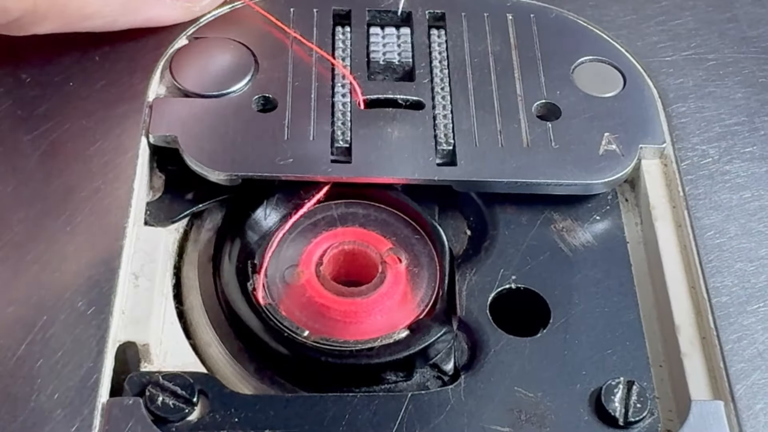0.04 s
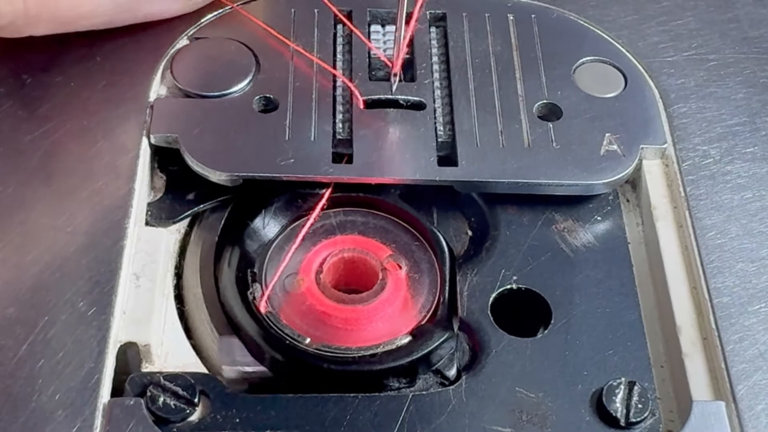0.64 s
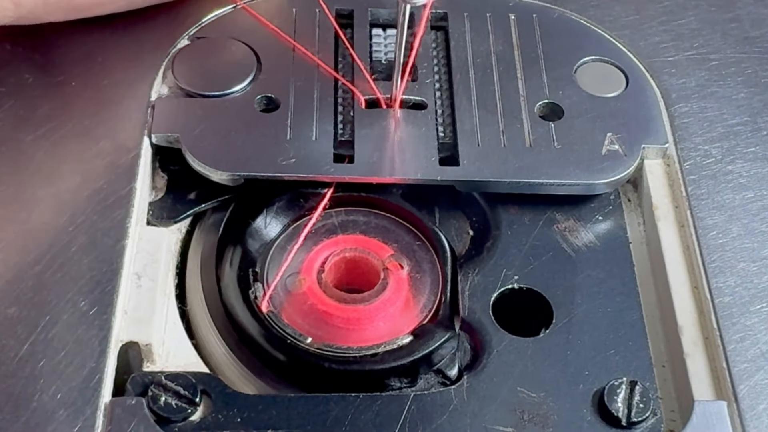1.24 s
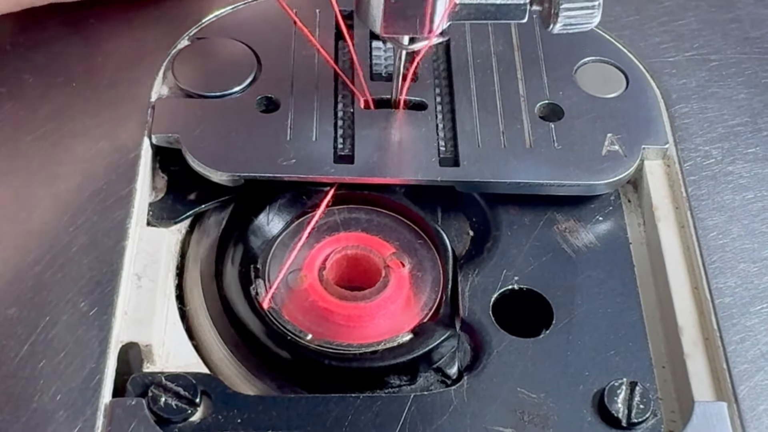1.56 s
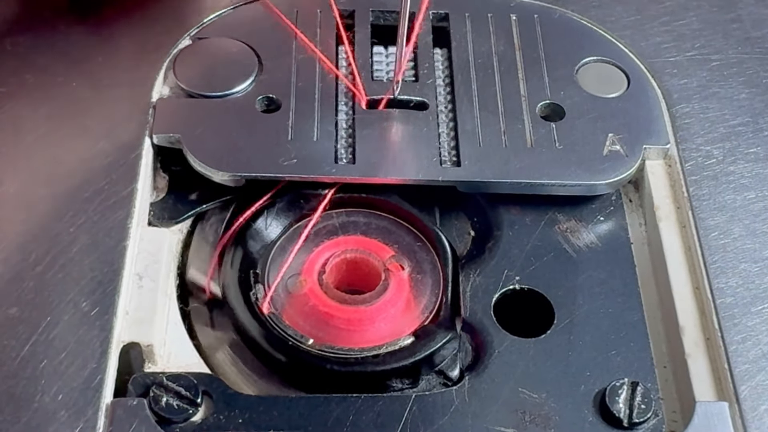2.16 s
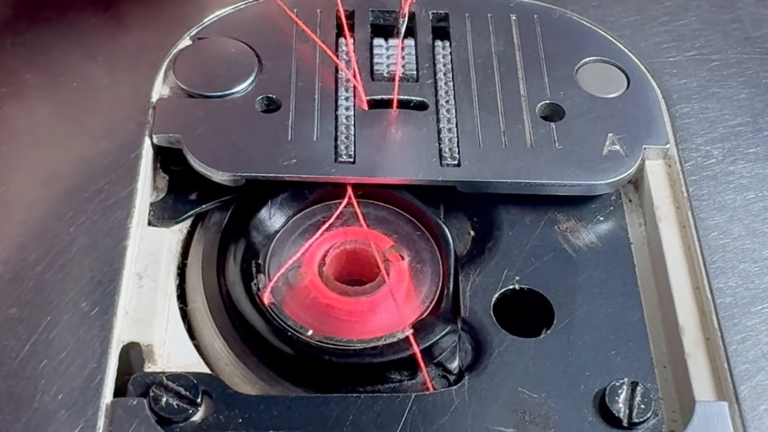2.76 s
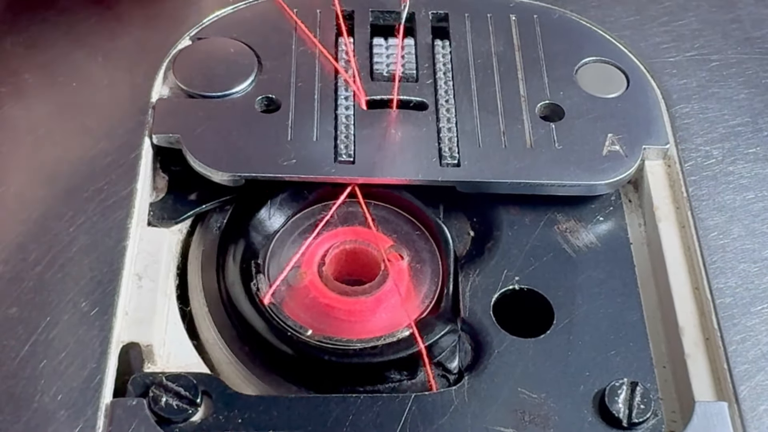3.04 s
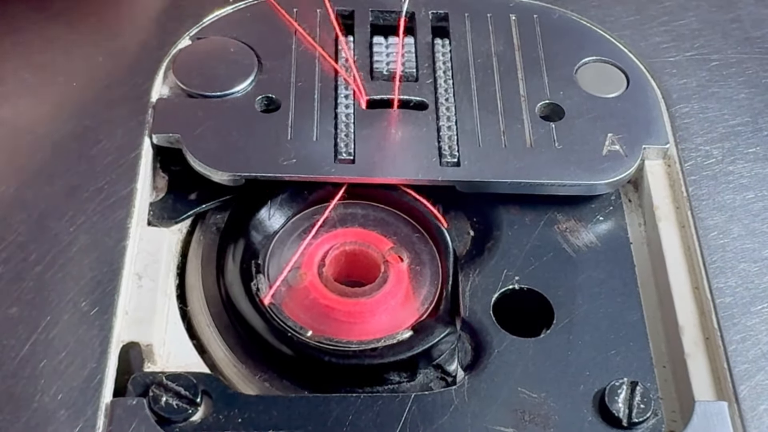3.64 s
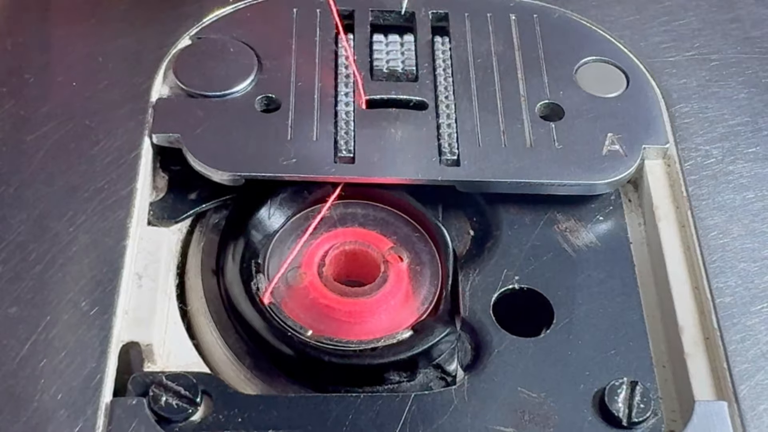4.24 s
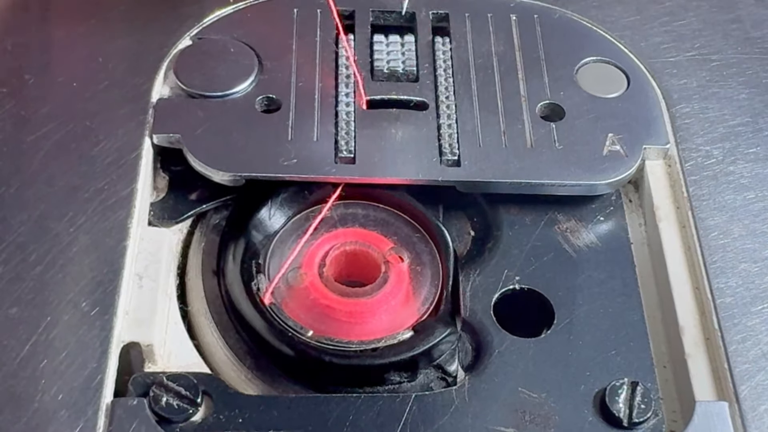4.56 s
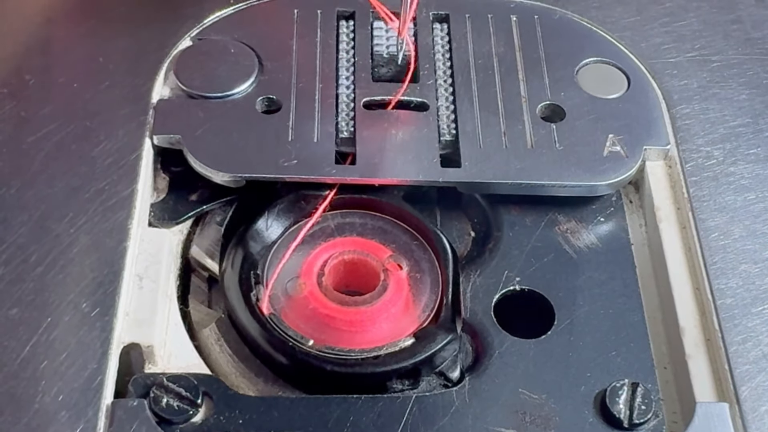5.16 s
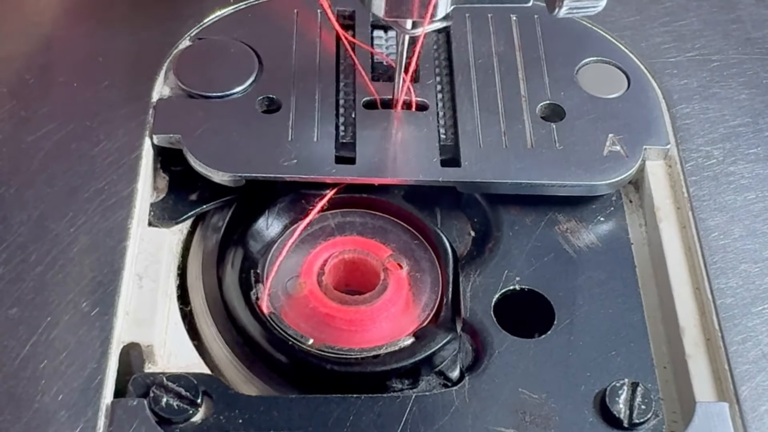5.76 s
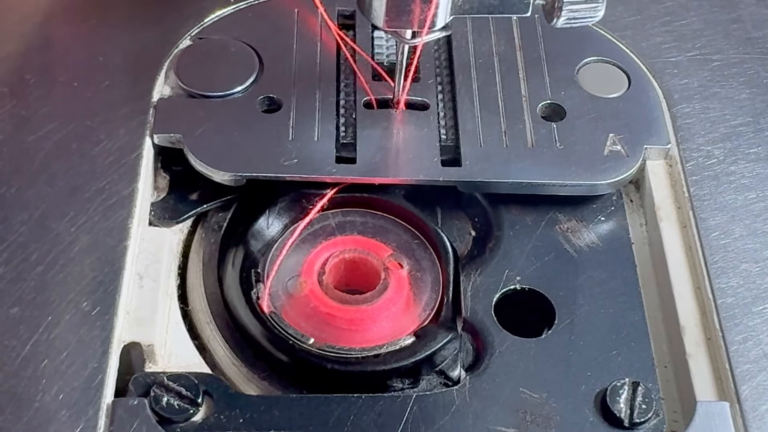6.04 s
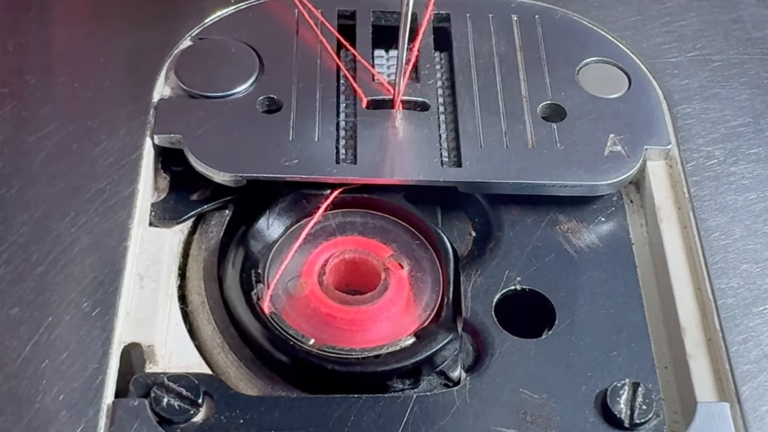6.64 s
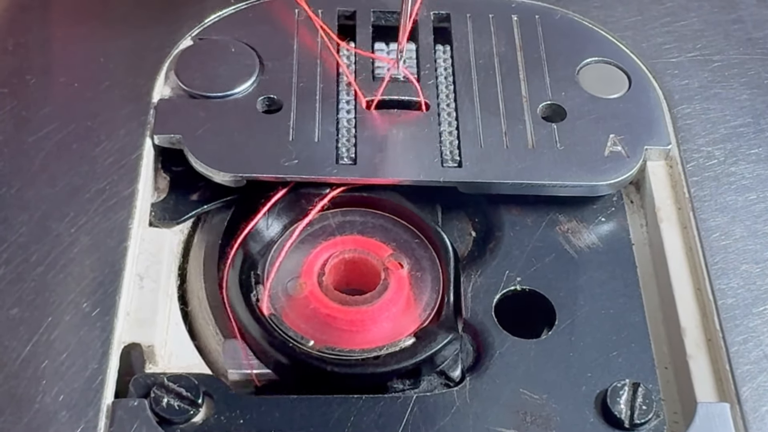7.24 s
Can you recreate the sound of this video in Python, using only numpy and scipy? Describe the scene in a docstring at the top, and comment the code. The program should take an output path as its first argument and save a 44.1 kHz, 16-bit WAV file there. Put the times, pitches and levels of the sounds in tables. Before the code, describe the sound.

A sewing machine is turned slowly by hand through two stitches, heard close in a quiet room. Oiled steel parts slide faintly and click at uneven moments, and the drive gives soft, dull knocks. Taut thread snaps with tiny sharp ticks at the start and drags with a short, grainy rustle twice later on. A quick cluster of metal clicks comes at the end. A small motor hums low and steadily throughout.

```python
"""Sewing machine turned by hand.

Two slow stitches, heard close. Steel parts slide and click, the thread is dragged and
plucked round the bobbin case, and the drive knocks softly as its play is taken up.
A small motor hums somewhere in the quiet room."""
import sys
import numpy as np
from scipy import signal
from scipy.fft import rfft, irfft, next_fast_len
from scipy.io import wavfile
from scipy.ndimage import uniform_filter1d

SR = 44100
rng = np.random.default_rng(int(sys.argv[2]) if len(sys.argv) > 2 else 0)


def file_out(sig):
    """Save sig as 16-bit WAV at sys.argv[1]."""
    # one column per channel
    cols = np.atleast_2d(sig).T
    # limit, then scale
    lim = np.clip(cols, -1, 1)
    pcm = np.round(lim * 32767).astype(np.int16)
    wavfile.write(sys.argv[1], SR, pcm)


N = 330309
TIME, FREQS = np.arange(N) / SR, np.fft.rfftfreq(next_fast_len(N, True), 1 / SR)
BURST_T = np.arange(4096) / SR


def amp(db):
    """Decibels to gain."""
    return 10 ** (np.asarray(db) / 20)


def unit(x):
    """Scales to rms 1."""
    return x / np.sqrt(np.mean(x ** 2) + 1e-30)


def read(points, hz):
    """Interpolates a table over log frequency."""
    f, value = np.transpose(points)
    return np.interp(np.log(hz + 1), np.log(f + 1), value)


def colour(x, gain):
    """Filters by one gain per bin of FREQS."""
    size = next_fast_len(N, True)
    return irfft(rfft(x, size) * gain, size)[..., :N]


def band(x, lo_hz, hi_hz, order=4):
    """Causal band-pass."""
    sos = signal.butter(order, [lo_hz, min(hi_hz, SR / 2 - 1)], "band", fs=SR, output="sos")
    return signal.sosfilt(sos, x)


def wander(hz):
    """Random drift of rms 1, up to about hz."""
    steps = np.arange(0, TIME[-1] + 1, .5 / hz)
    return unit(np.interp(TIME, steps, rng.standard_normal(len(steps))))


def add(mix, at_s, db, sound):
    """Adds a short sound with the energy of 10 ms at level db."""
    part = mix[round(at_s * SR):][:len(sound)]
    gain = amp(db) * np.sqrt(.01 * SR / np.sum(sound ** 2))
    part += gain * sound[:len(part)]


def burst(lo_hz, hi_hz, rise_s, decay_s):
    """Impact in one band: a brief crack, then many close modes swell and die."""
    crack = 2.4 * np.exp(-BURST_T / (.27 * decay_s))
    envelope = (1 - np.exp(-BURST_T / rise_s)) * (crack + np.exp(-BURST_T / decay_s))
    return band(rng.choice([-1., 1.], len(BURST_T)) * envelope, lo_hz, hi_hz, order=3)


# diffuse field: f/Hz, left-right coherence/0-1
COHERENCE = [(60, .999), (250, 0.86), (600, 0.5), (1500, 0), (3000, 0.7), (6000, 1), (9000, 0.98)]

def diffuse(a, b):
    """Two unrelated signals form a diffuse stereo field."""
    coherence = np.clip(read(COHERENCE, FREQS), 0, 1)
    mid = colour(a, np.sqrt((1 + coherence) / 2))
    side = colour(b, np.sqrt((1 - coherence) / 2))
    return np.array([mid + side, mid - side])


# room noise spectrum: f/Hz, gain/dB
AIR_SPECTRUM = [(20, -27), (40, -16), (100, -10.5), (135, -0.5), (210, -2.5), (290, -9), (360, -7),
                (520, -13), (720, -20.5), (1250, -21.5), (1500, -26.5), (2000, -29), (2900, -42),
                (4000, -42), (4800, -57.5), (8000, -59), (12500, -64.5), (15200, -57.5)]

def room_air():
    """Dull, even room noise."""
    noise = diffuse(*rng.standard_normal((2, N)))
    return amp(-49.5) * unit(colour(noise, amp(read(AIR_SPECTRUM, FREQS))))


def tone(cycles, unsteady, flutter_hz):
    """A hum of rms 1, trembling in level and phase."""
    tremble = 1 + unsteady * (wander(flutter_hz) + 1j * wander(flutter_hz))
    return unit((tremble * np.exp(2j * np.pi * (cycles + rng.random()))).real)


# motor harmonics: shaft order, relative level/dB, unsteadiness/0-1
MOTOR_HARMONICS = [(1, 0, 0.06), (2, -29, 0.6), (3, -27.5, 0.1), (5, -25.5, .25), (6, -30.5, 0.4),
                   (7, -38, 0.9), (18, -32.5, 0), (19, -41, 0.3), (20, -37, 0.1), (21, -46.5, 0),
                   (25, -44.5, 0.1)]
# brief dips in the motor's level: t/s
MOTOR_DIPS = [.44, 1.71, 3.32]
# other room hums: f/Hz, level/dB, unsteadiness/0-1
ROOM_DRONES = [(139.2, -56.5, 0.6), (166, -57.5, 0.5), (245.6, -53, 0.16), (326.2, -61, 1), (348, -65, 1)]

def hum():
    """A motor hums at multiples of its shaft speed, over the other hums of the room."""
    shaft_hz, dip_db, dip_half_width_s = 77.21, -1.1, .042
    turns = np.cumsum(shaft_hz + .08 * wander(1.5)) / SR
    motor = sum(amp(db) * tone(round(order) * turns, unsteady, flutter_hz=4)
                for order, db, unsteady in MOTOR_HARMONICS)
    drones = sum(amp(db) * tone(hz * TIME, unsteady, flutter_hz=9) for hz, db, unsteady in ROOM_DRONES)
    dips = sum(np.exp(-((TIME - at_s) / dip_half_width_s) ** 2) for at_s in MOTOR_DIPS)
    motor_db = -34 + dip_db * dips + .26 * wander(5)
    sound = unit(motor) * amp(motor_db) + drones
    # bass louder on the right, earlier on the left
    balance_db = read([(80, -1.8), (200, .3), (1400, 1.4)], FREQS)
    lead_rad = read([(80, .37), (200, .26)], FREQS)
    left = amp(balance_db / 2) * np.exp(.5j * lead_rad)
    return np.array([colour(sound, left), colour(sound, 1 / left)])


# room decay: f/Hz, T60/s
ROOM_DECAY = [(500, .3), (3000, 0.18), (8000, 0.12), (15000, 0.094)]

def reverb(x):
    """A short diffuse tail that dies sooner in the treble."""
    hz, t, spectra = signal.stft(rng.standard_normal((2, SR // 2)), SR, nperseg=256)
    decay = amp(-60 * t / read(ROOM_DECAY, hz)[:, None])
    tails = signal.istft(spectra * decay, SR, nperseg=256)[1]
    tails *= 1 - np.exp(-np.arange(tails.shape[1]) / SR / .0055)  # build-up
    wet = signal.fftconvolve(x[None], tails / np.linalg.norm(tails[0]), axes=1)[:, :N]
    wet_db = read([(1000, -14.5), (4000, -15), (9000, -22.5), (15000, -10.5)], FREQS)
    return colour(diffuse(*wet), amp(wet_db))


def loose_parts():
    """Loose parts touch lightly at random moments."""
    per_s, level_db, spread_db = 3.4, -81.5, 4
    out = np.zeros(N)
    for when, size in rng.random((round(per_s * N / SR), 2)):
        tick = burst(5000, 13000, rise_s=.001, decay_s=.0044)
        add(out, when * TIME[-1], level_db + spread_db * (2 * size - 1), tick)
    return out


# thread resonances: start/s, end/s, f/Hz, width/Hz, level/dB
THREAD_NOTES = [(2.784, 2.96, 4700, 700, -71), (3.995, 4.204, 11530, 350, -81),
                (7.062, 7.294, 11400, 700, -74)]

def thread_singing():
    """Sliding round the bobbin case feeds one resonance of the taut thread."""
    out = np.zeros(N)
    for start, end, hz, width, db in THREAD_NOTES:
        arch = np.sin(np.pi * np.clip((TIME - start) / (end - start), 0, 1))
        resonance = band(rng.standard_normal(N), hz - width / 2, hz + width / 2, order=2)
        out += amp(db) * arch * unit(resonance)
    return out


def friction(per_s, spread_db, smooth):
    """Tiny slips of uneven size over a smooth rub."""
    sizes = amp(spread_db * np.minimum(rng.exponential(1, N), 4))
    slips = sizes * rng.choice([-1., 1.], N) * (rng.random(N) < per_s / SR)
    return unit(unit(slips) + smooth * rng.standard_normal(N))


def moving_contact(x, depth_db, lasting_s, width_hz):
    """Resonances come and go as the contact moves along."""
    spectra = signal.stft(x, SR, nperseg=512)[2]
    patches = rng.standard_normal(spectra.shape)
    patches = uniform_filter1d(patches, max(1, round(width_hz * 512 / SR)), axis=0)
    patches = uniform_filter1d(patches, max(1, round(lasting_s * SR / 256)), axis=1)
    return signal.istft(spectra * amp(depth_db * unit(patches)), SR, nperseg=512)[1][:N]


def strokes(rows, attack_s, release_s):
    """Body and treble gains of a rub: each stroke eases in, swells or sags, and dies away."""
    body, treble = np.zeros((2, N))
    for start, end, db, treble_db, swell_db in rows:
        progress = np.clip((TIME - start) / (end - start), 0, 1)
        attack = (1 + np.tanh((TIME - start) / (2 * attack_s))) / 2
        release = np.exp(-np.maximum(TIME - end, 0) / release_s)
        gain = attack * release * amp(db + swell_db * (progress - .5))
        body, treble = np.hypot(body, gain), np.hypot(treble, gain * amp(treble_db))
    return body, treble


# handwheel pushes: start/s, end/s, level/dB, treble re level/dB, swell/dB
WHEEL_PUSHES = [(0, .3, -73, -2, -3), (.37, .72, -75, -4.5, -1.5), (.73, .87, -81, -8, -3),
                (1.23, 1.52, -71, -3, -6.5), (1.53, 1.66, -68, -3.5, -2), (1.98, 2.06, -72, -6, -4),
                (2.15, 2.24, -72.5, -1.5, -7), (2.35, 2.49, -68, -2.5, 3), (2.8, 2.85, -69, -2.5, -8),
                (3.44, 3.62, -78, -3.5, -11), (3.78, 3.96, -88, 1, 0), (4.03, 4.19, -79, -2, 0),
                (5.02, 5.145, -71, -2.5, 8), (5.41, 5.49, -71, -1, -0.5), (5.63, 5.86, -68, -2, -8),
                (6.12, 6.24, -67, -1.5, -2.5), (6.27, 6.41, -68.5, -3.5, 0), (6.72, 6.86, -71.5, -2.5, 3.5),
                (6.87, 7.02, -68.5, -4.5, -8), (7.08, 7.21, -74.5, -2, -9), (7.25, 7.34, -63.5, -1.5, 1),
                (7.35, 7.385, -51.5, -3, -3)]
# steel rub spectrum, with a low-pass at 16 kHz: f/Hz, gain/dB
SLIDE_FILTER = [(1500, 6), (2500, -2), (3600, -1.5), (4800, -2.5), (6000, -11), (7000, -10), (7400, -10),
                (8100, -13.5), (9500, -10.5), (11300, -10), (12400, -4), (13600, -13), (15600, -6.5),
                (16200, -31)]

def steel_sliding():
    """Oiled steel rubs finely, catches now and then, and excites the machine's resonances."""
    idle_body_db, idle_treble_db = -86.5, -91  # bearings between pushes
    body, treble = strokes(WHEEL_PUSHES, attack_s=.0084, release_s=.017)
    grain = friction(per_s=3000, spread_db=3.5, smooth=1)
    catches = amp(-7) * friction(per_s=50, spread_db=2.5, smooth=0)
    contact = moving_contact(grain + catches, depth_db=3.5, lasting_s=.1, width_hz=450)
    rub = colour(contact, amp(read(SLIDE_FILTER, FREQS)))
    hiss = unit(band(rub, 6300, 16000)) * np.hypot(treble, amp(idle_treble_db))
    rasp = unit(band(rub, 1700, 6300)) * np.hypot(body, amp(idle_body_db))
    flicker_db = .55 * wander(30) + 1.1 * wander(9)
    return (hiss + rasp) * amp(flicker_db)


# thread pulls: start/s, end/s, level/dB, treble re level/dB, swell/dB
THREAD_PULLS = [(2.895, 3.005, -60.5, -9.5, 0.5), (4.712, 4.965, -56, -6.5, -7)]
# thread rub spectrum, with a low-pass at 16 kHz: f/Hz, gain/dB
DRAG_FILTER = [(700, 3.5), (1200, -1), (2100, -15), (2900, -16.5), (4400, -14), (5700, -17), (7300, -15),
               (8500, -6), (9400, -6), (10200, -7), (12200, -7), (13300, -18.5), (15400, 2), (16300, -21)]

def thread_dragging():
    """Fibres catch and slip in the guides, grainier than the steel."""
    body, treble = strokes(THREAD_PULLS, attack_s=.0097, release_s=.015)
    grain = friction(per_s=1600, spread_db=3.5, smooth=.4)
    contact = moving_contact(grain, depth_db=4, lasting_s=.021, width_hz=400)
    rub = colour(contact, amp(read(DRAG_FILTER, FREQS)))
    fizz = unit(band(rub, 7000, 16000)) * treble
    rustle = unit(band(rub, 610, 7000)) * body
    return fizz + rustle


# drive knocks: t/s, thud/dB, first touch/dB
DRIVE_KNOCKS = [(.959, -50, -57.5), (1.616, -47.5, -73), (1.77, -56.5, -83.5), (4.437, -53.5, -71),
                (4.738, -47.5, -64), (5.213, -49.5, -69.5), (5.937, -43, -64.5), (6.335, -49.5, -71),
                (6.484, -53.5, -68), (6.499, -50, -78), (6.69, -62, -70)]
# housing modes: f/Hz, relative level/dB, T60/s
HOUSING_MODES = [(506, 0, 0.041), (587, 4.5, 0.067), (685, -2, 0.065), (860, -10.5, 0.095),
                 (940, -1, 0.034), (1058, -6.5, 0.099), (1255, -4, 0.063)]

def drive_knocks():
    """Play in the drive is taken up: a light touch, then the housing's low modes ring."""
    out = np.zeros(N)
    for at_s, thud_db, touch_db in DRIVE_KNOCKS:
        thud = np.zeros(len(BURST_T))
        for hz, db, t60 in HOUSING_MODES:
            cycles = hz * rng.normal(1, .011) * BURST_T + rng.random()
            thud += amp(db - 60 * BURST_T / t60) * np.sin(2 * np.pi * cycles)
        add(out, at_s, thud_db, thud * (1 - np.exp(-BURST_T / .00094)))
        add(out, at_s - .001, touch_db, burst(1400, 4600, rise_s=.0012, decay_s=.011))
    return out


# thread snaps: t/s, level/dB
THREAD_SNAPS = [(0.1419, -46), (0.1945, -60), (0.2172, -35.5), (2.8999, -61), (2.928, -56), (2.9762, -48.5),
                (2.98, -56.5), (2.992, -56.5), (4.73, -51.5), (4.735, -35.5), (4.7625, -47), (4.7816, -41),
                (4.8496, -42.5), (4.9215, -51.5), (4.9435, -48), (4.95, -52), (4.9926, -47.5)]

def thread_snaps():
    """The taut thread snaps over an edge and shakes the frame."""
    out = np.zeros(N)
    for at_s, db in THREAD_SNAPS:
        twang = unit(burst(8230, 9700, rise_s=.00022, decay_s=.0027))
        crack = unit(burst(8300, 16200, rise_s=.00015, decay_s=.0021))
        rattle = unit(burst(3600, 7600, rise_s=.0022, decay_s=.0046))
        thump = unit(burst(592, 2200, rise_s=.0039, decay_s=.015))
        add(out, at_s - .0003, db, twang + amp(-4.5) * crack)
        add(out, at_s, db - 11.5, rattle + amp(2.5) * thump)  # frame
    return out


# needle plate and hook modes: f/Hz, gain/dB, T60/s
PLATE_MODES = [(3500, -14, 0.13), (6000, -14, .12), (7420, 8, 0.14), (9340, -15, .2), (10470, -6.5, .08)]

def plate_ring(x):
    """Needle plate and hook ring on faintly after being shaken."""
    out = np.zeros(N)
    for hz, db, t60 in PLATE_MODES:
        radius = amp(-60 / (t60 * SR))
        pole = radius * np.exp(2j * np.pi * hz / SR)
        out += amp(db) * 2 * signal.lfilter([1 - radius], [1, -pole], x).real
    return out


def struck_part(hz, decay_cycles):
    """One quickly damped mode."""
    cycles = hz * BURST_T
    return np.sin(2 * np.pi * cycles) * np.exp(-cycles / decay_cycles) * (1 - np.exp(-cycles / 2))


# hook, feed and needle bar clicks: t/s, blow/dB, hardness (treble re body)/dB, ring f/Hz, ring/dB
STEEL_CLICKS = [(0.9502, -47.5, -31.5, 3870, -52.5), (1.298, -70.5, -0.5, 7400, -69),
                (1.605, -69, -1, 7400, -70), (2.197, -71, -3, 12700, -74), (2.345, -56.5, -1, 5200, -57.5),
                (2.429, -57.5, -8, 3750, -63), (2.468, -58, -11, 2900, -58.5),
                (2.5498, -52.5, -12, 10570, -62), (2.558, -45, 13.5, 4740, -42),
                (2.577, -56.5, 0, 1997, -62.5), (2.6152, -49.5, -6, 1970, -64),
                (2.619, -53, -7.5, 2010, -48.5), (3.1337, -53, -1.5, 11680, -55),
                (3.4777, -51, 8, 5540, -41), (4.0458, -67.5, 13, 11600, -54.5),
                (4.164, -71, 15, 5560, -60.5), (4.435, -70.5, -7, 1800, -73),
                (5.017, -61.5, -18, 1780, -72), (5.138, -61.5, -12, 3220, -60.5),
                (5.1911, -54.5, -31, 1255, -50), (6.1418, -62.5, -5, 12300, -60),
                (6.17, -61, -8, 4740, -59.5), (6.853, -53, -5, 10900, -65), (6.836, -65, -5, 5000, -65),
                (7.0733, -75, 4, 1820, -67), (7.248, -56, -25, 1870, -67), (7.29, -54, -16, 5100, -55),
                (7.3111, -42.5, -6, 1905, -42), (7.3446, -51, -2, 4770, -44), (7.384, -53.5, -5, 6540, -55),
                (7.396, -55, -12, 3980, -54), (7.409, -52, -11, 1850, -67)]
# machine's click response: low f/Hz, high f/Hz, rise/s, decay/s, level re blow/dB, hardness share/0-1
CLICK_RESPONSE = [(764, 1400, 0.00318, 0.0076, -1.5, 0), (1660, 2430, .0015, 0.0081, -1.5, .07),
                  (3060, 6870, 0.00093, .0063, 0.5, 0.4), (8400, 12040, 0.0008, .0027, -.5, 0.98),
                  (11520, 21000, .0008, 0.0015, -1.5, 1)]

def steel_clicks():
    """Steel meets steel: the treble cracks first, the struck part rings, heavier parts follow."""
    out = np.zeros(N)
    for at_s, blow_db, hardness_db, ring_hz, ring_db in STEEL_CLICKS:
        for lo_hz, hi_hz, rise_s, decay_s, band_db, share in CLICK_RESPONSE:
            db = blow_db + band_db + share * hardness_db
            add(out, at_s - .0004, db, burst(lo_hz, hi_hz, rise_s, decay_s))
        add(out, at_s - .0002, ring_db, struck_part(ring_hz, decay_cycles=5.5))
    return out


# machine's stereo phase: f/Hz, left lead/rad
LEFT_LEAD = [(500, .2), (1400, -.2), (2200, -.55), (3200, 0), (4900, .7), (6000, .4), (7200, 0),
             (9000, -.2), (10000, -.7), (10600, -.1), (11700, -.1), (12400, -1), (13400, -3), (14300, -4.2),
             (15500, -6.25)]
# machine's stereo balance: f/Hz, left re right/dB
LEFT_BALANCE = [(500, 2), (900, 1.5), (1400, 5.5), (2200, 3), (3200, 0)]

def scene():
    """The near machine reaches left and right out of step; the room surrounds it."""
    steel = steel_clicks() + loose_parts() + steel_sliding()
    machine = steel + plate_ring(steel) + drive_knocks()
    machine += thread_snaps() + thread_dragging() + thread_singing()
    left = np.exp(.5j * read(LEFT_LEAD, FREQS)) * amp(read(LEFT_BALANCE, FREQS) / 2)
    return colour(machine + reverb(machine), np.array([left, 1 / left])) + hum() + room_air()


def record(dry):
    """Low-pass at 16.5 kHz."""
    taps = signal.firwin(255, 16500, window=("kaiser", 8), fs=SR)
    return signal.oaconvolve(dry, taps[None], "same", axes=1)


dry = scene()
out = record(dry)
file_out(out)
```